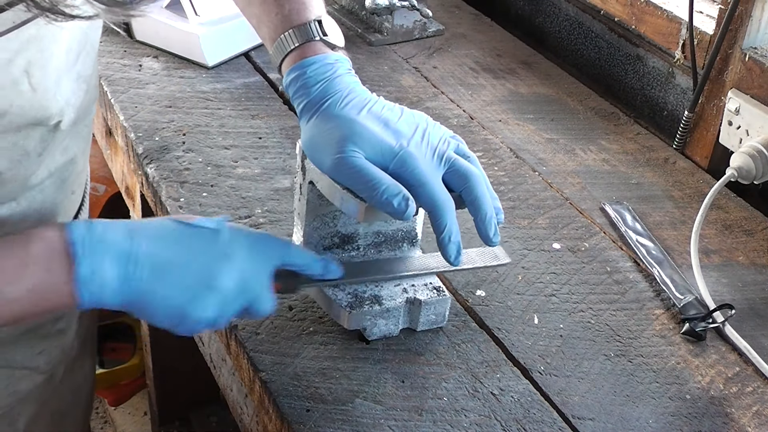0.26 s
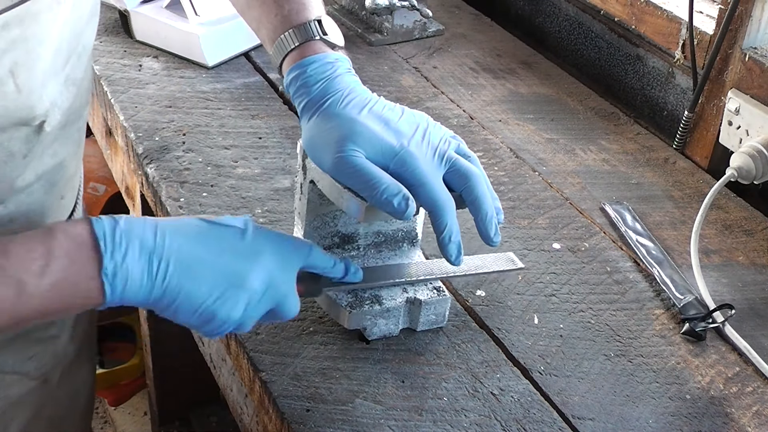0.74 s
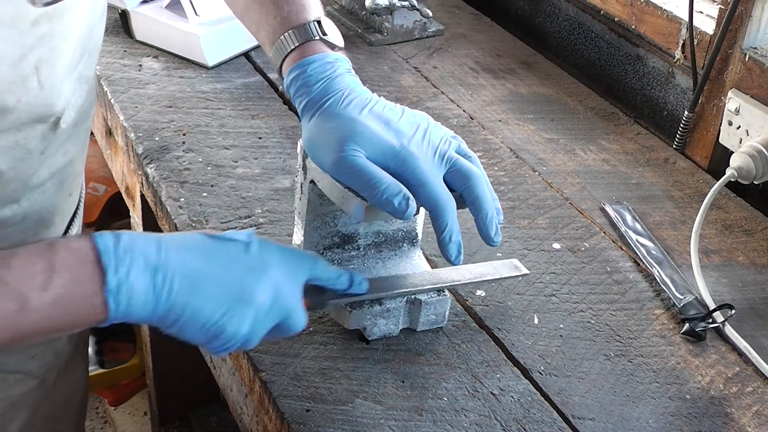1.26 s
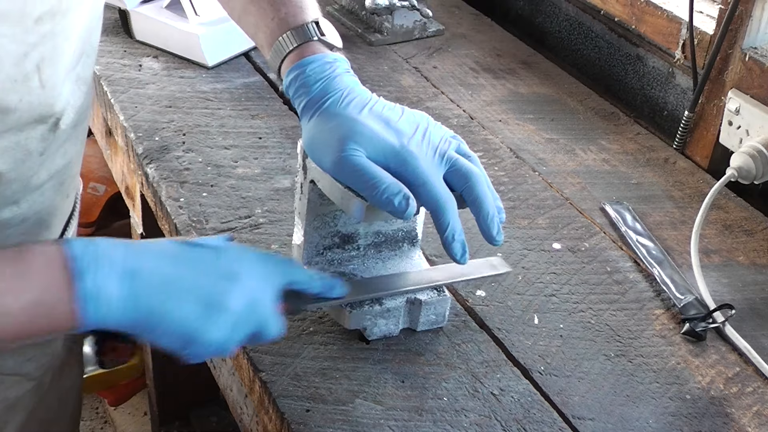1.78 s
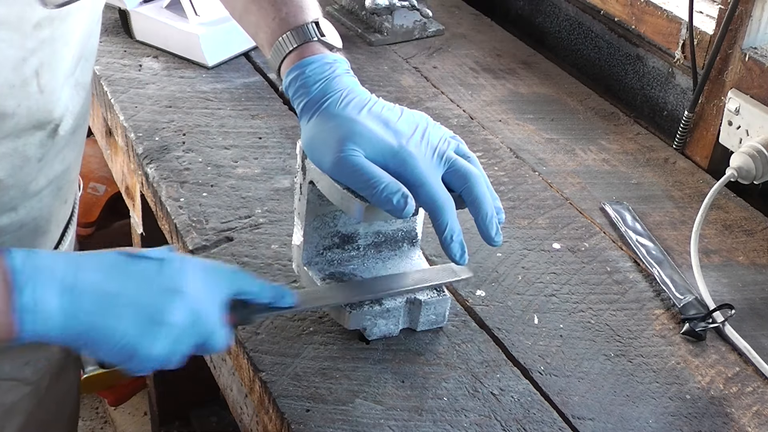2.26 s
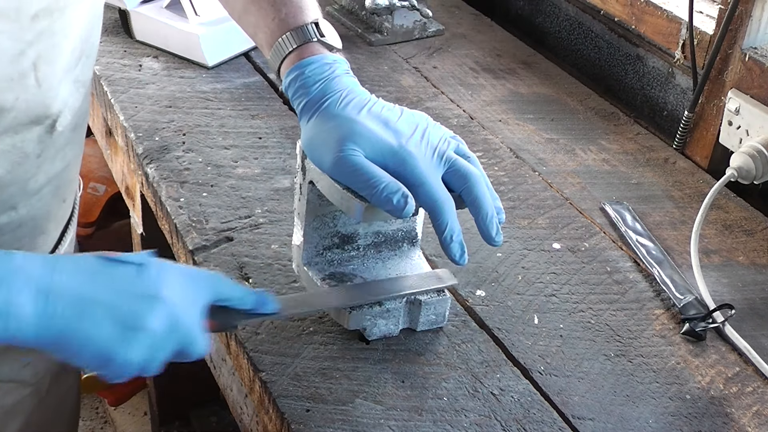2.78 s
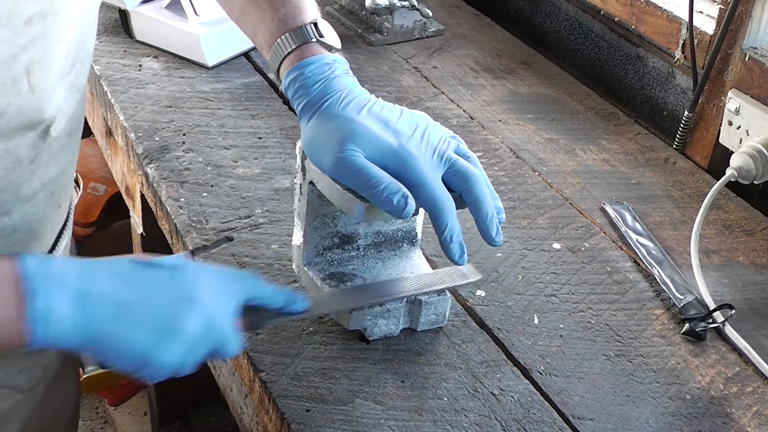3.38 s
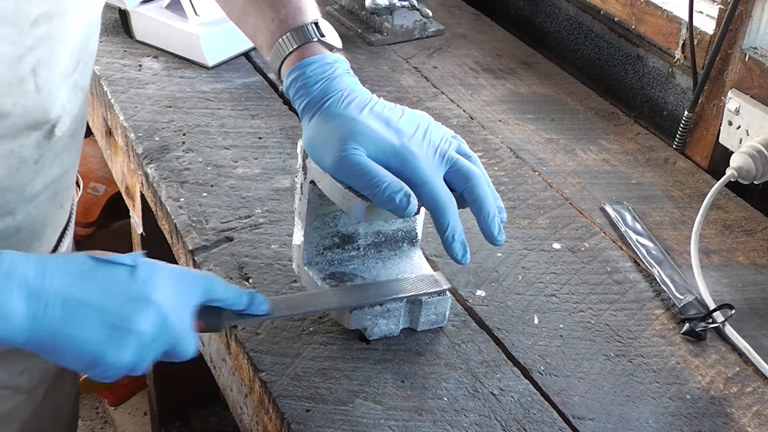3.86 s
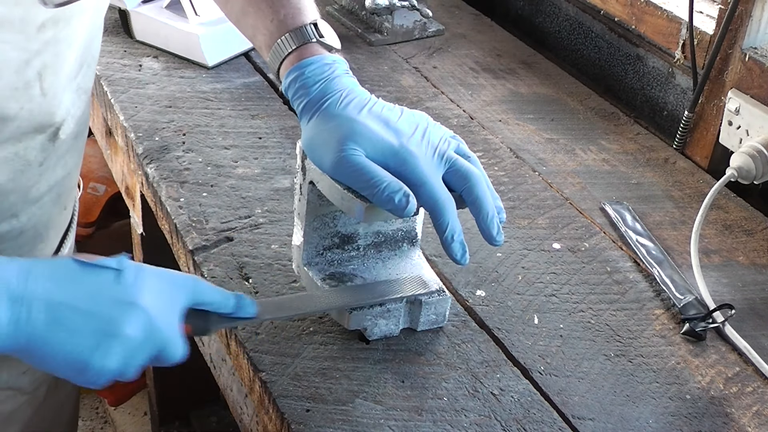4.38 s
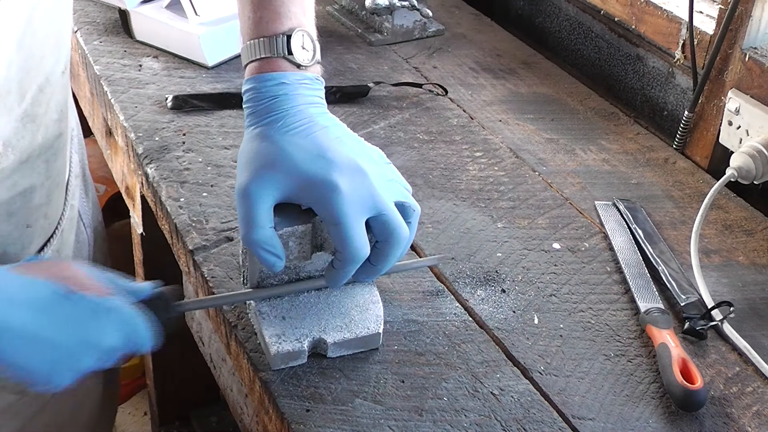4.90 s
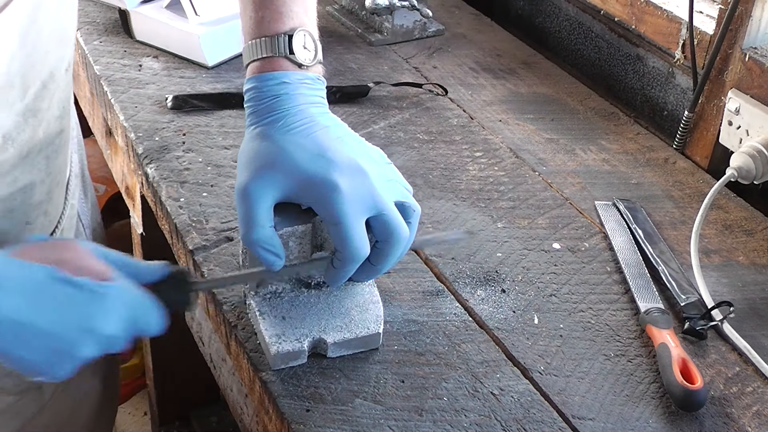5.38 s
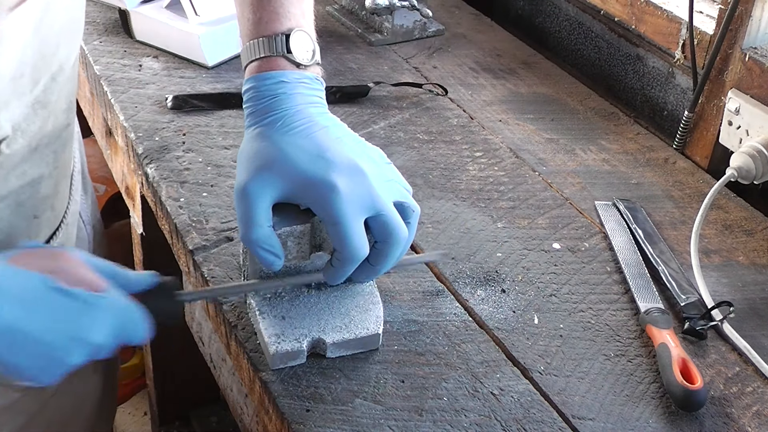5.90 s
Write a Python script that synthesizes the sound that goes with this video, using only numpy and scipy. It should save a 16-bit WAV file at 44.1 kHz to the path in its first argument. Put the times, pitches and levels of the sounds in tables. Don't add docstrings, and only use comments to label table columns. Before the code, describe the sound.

Close stereo microphone in a small workshop. A wide steel file rasps a porous metal casting on a wooden bench, roughly two strokes a second. Each lands with a sharp tap, swells into dense, bright grating with a hollow grinding judder, then eases off to a brief gap. Near the end a slimmer file ticks into place and makes a longer, thinner scrape, a tapped shorter one and the start of another. A low hum lies underneath.

```python
import sys
import numpy as np
from scipy import signal
from scipy.fft import rfft, irfft, next_fast_len
from scipy.io import wavfile
from scipy.ndimage import uniform_filter1d, map_coordinates

SR = 44100
rng = np.random.default_rng(int(sys.argv[2]) if len(sys.argv) > 2 else 0)


def digitize_waveform(pressure):
    field = np.atleast_2d(pressure).T
    bounded = np.clip(field, -1, 1)
    quanta = np.round(bounded * 32767).astype(np.int16)
    wavfile.write(sys.argv[1], SR, quanta)


def volts_from_db(level):
    exponent = np.asarray(level, float) / 20
    return 10 ** exponent


N = 270774
SIZE = next_fast_len(N + SR)
HZ = np.fft.rfftfreq(SIZE, 1 / SR)
SWAP_S = 4.845

# landing_s, pause_s, rise_s, hold_s, blade_db at full push
STROKES = [(-.05, 0.051, 0.08, 0.13, -31.5), (0.538, 0.041, .14, 0.046, -38),
           (1.067, 0.06, 0.096, 0.075, -29), (1.616, 0.038, 0.089, 0.13, -32),
           (2.144, 0.062, 0.099, .12, -30), (2.761, 0.021, 0.071, 0.13, -28.5),
           (3.239, 0.073, .035, 0.21, -32), (3.812, 0.041, .11, 0.13, -29),
           (4.364, .035, 0.098, 0.1, -25.5), (4.854, .19, .03, 0.25, -33.5), (5.589, 0.043, .08, 0.1, -33),
           (6.047, 0.0015, 0.0035, 0.048, -36.5)]
# skid_db, skid_on_work_db, change_over_hold_db,
# casting_over_blade_db, bench_over_blade_db
LEAN = [(-63, 7.5, -1, 6.5, 7.5), (-36, -14, 1, 5.5, 3.5), (-35, -6.5, -1, 10, 7.5),
        (-34.5, -3.5, 3, 6.5, 4.5), (-34, 4.5, -1, 10.5, 7), (-39, 1, -5, 8.5, 3), (-28, -2, -1, 8, 6),
        (-33.5, 1.5, -9, 5.5, 4.5), (-34, 1, -9, 7.5, 1), (-72.5, -15, -7.5, 8, 11),
        (-32.5, 4.5, -3, 7, 12), (-30.5, -1.5, -0.5, 5, 9)]
PUSH_FOLLOWS = [1.017, 1.157, 0.8, 0.53]
# centre_s, half_length_s, casting_db, bench_db
SURGES = [(0.251, .05, 5, 6.5), (.66, .04, 1, 6), (0.846, .025, 9, 9.5), (1.19, 0.023, 5.5, 2),
          (1.41, 0.026, 13, 6), (1.77, 0.039, 2.5, 4.5), (1.897, .03, 8, 1), (2.399, .03, 0.5, 4),
          (3.43, .04, 2, 7), (3.57, .025, 9.5, -1.5), (3.962, .035, 7.5, 8.5), (4.967, .07, -6.5, -8.5),
          (5.071, .03, -7, 5.5), (5.259, .07, 4.5, 7.5), (5.731, 0.022, 5.5, 6)]
# start_s, peak_db, edge_db, casting_db, bench_db
TAPS = [(0.5414, -21, 12.5, -5, -17.5), (1.064, -17.5, -3, 13.5, 1), (1.6179, -19.5, 9, -1.5, -20),
        (2.141, -21, 8.5, 3, -4), (2.1729, -37, 13.5, 11, 11), (2.7575, -29.5, 4.5, 7.5, -13),
        (2.7898, -25.5, 3.5, 10, -6), (2.825, -23.5, 11.5, 5.5, -16), (3.2334, -23.5, 6, 12, 1),
        (3.8135, -18.5, 2.5, -8, -18), (4.3661, -28, 7.5, 14, -8), (5.5907, -21.5, -31, -20, -22),
        (5.6055, -19.5, -34, 9, -2.5), (5.654, -34, -4, -16, -7), (6.0482, -21, 1.5, -18, -4),
        (6.124, -30, -0.5, -20, 5)]
# start_s, peak_db, edge_db, casting_db
CATCHES = [(0.0218, -42, -2.5, 10.5), (0.2868, -40, 10.5, 13.5), (0.3074, -36, 8.5, 1),
           (0.3328, -43.5, -12.5, -0.5), (0.6198, -41.5, 9, 6), (0.8404, -41.5, 3, 14),
           (1.1439, -42.5, 5.5, 5.5), (1.1712, -22, 7, 10), (1.4104, -37.5, 7, 10), (1.6814, -30.5, 4.5, 0),
           (2.4433, -23, 0.5, 12), (3.3268, -24.5, 11.5, -7), (3.413, -17, 5, 11),
           (3.6152, -35.5, -4.5, -11), (3.8842, -36.5, 1, -11), (4.0825, -23, 5, 11), (4.4298, -26, 0, 2),
           (5.07, -24.5, -0.5, -23)]
# pitch_hz, width_hz, level_db
BLADE_MODES = [
    [(3306, 38, -7), (4330, 40, 0), (6590, 410, -10)],
    [(3040, 84.7, -12.5), (4300, 48, -2.5), (5162, 44, -15), (5710, 34.92, -6.5)],
]
EDGE_MODES = [
    [(8716, 380, -2.5), (11055, 94, 6), (13570, 200, -5)],
    [(8100, 19, 0.5), (8237, 25, -7), (9380, 56.7, -6.5)],
]
CASTING_MODES = [
    [(898, 14, -10), (1079, 30, 0.5), (1117.4, 17, 2), (1175, 10, -0.5), (1396, 21, -3.5), (1335, 24, -12)],
    [(1001.6, 74, -3), (1188.2, 130, -0.5), (1396, 46, 5)],
]
BENCH_MODES = [
    [(187, 65, -12), (535, 17, -3.5)],
    [(180, 52, 3.5), (357, 65, 0.5), (531, 15, -3), (783, 20, -3)],
]
# pitch_hz, width_hz, level_db
BLADE_SINGING = [
    [(2410, 16, -9), (4336, 12, 2), (6675, 14, -11)],
    [(2433, 22, -8), (6675, 10, 1)],
]
EDGE_SINGING = [
    [(9465, 14, 1), (10573, 14, 5)],
    [(8226, 11, 1), (8646, 13, -3), (10960, 20, -3), (11480, 14, -4), (13500, 30, -9), (14850, 20, -6)],
]
# pitch_hz, level_db per Hz
BLADE_SCRAPE = [
    [(1290, -36.5), (2200, -15), (3860, -10.5), (4340, -7.5), (7400, -6), (9620, -30), (16300, -120)],
    [(1290, -23.5), (2200, -14), (3420, -14), (4430, -6.5), (7400, -17.5), (9620, -40), (16300, -120)],
]
EDGE_SCRAPE = [
    [(4350, -34.5), (7400, -9.5), (10000, -2), (11000, -1.5), (12300, -15.5), (14000, -19), (16000, -9.5)],
    [(4350, -31), (7400, -16.5), (8000, -7.5), (10400, -6), (12400, -18), (14600, -18), (16000, -23.5)],
]
CASTING_GRIND = [
    [(500, -45.5), (850, -31.5), (1140, -5.5), (1250, -2), (2200, -19.5), (2860, -71), (4840, -120)],
    [(500, -30), (850, 3), (1310, -2), (1410, 4.5), (2200, -15), (2860, -54), (4840, -120)],
]
BENCH_DRUM = [
    [(24, -54), (40, -28), (168, 6), (290, -2), (543, 1.5), (850, -8.5), (1100, -42), (1870, -120)],
    [(24, -21.5), (40, -0.5), (107, -7), (176, 2), (550, -1), (850, -13), (1100, -54.5), (1870, -120)],
]
# start_s, peak_db, brightness_db per octave
TICKS = [(4.8924, -34, 3), (4.9043, -21, 13), (4.9524, -20.5, -1), (4.9828, -36, -1), (5.018, -48, 1),
         (5.0442, -42, 0.1)]
# pitch_hz, left_minus_right_db
STEREO_TILT = [(5000, 0), (9000, -2.6), (12000, -1), (14000, 1.5)]
# pitch_hz, left_lead_radians
STEREO_LEAD = [(5800, 0), (10900, -.45), (12300, .2), (13300, 1.1), (14600, .2)]
# pitch_hz, level_db
SCATTER = [(100, -37), (300, -21), (2000, -20), (5000, -14), (9000, -17), (14000, -11)]
# pitch_hz, t60_s
ROOM_DECAY = [(100, 0.14), (1000, 0.24), (4000, 0.23), (12000, 0.017)]
# centre_s, half_length_s, level_db
ROCKING = [(.27, 0.085, -29.5), (1.082, 0.021, -31), (1.22, 0.079, -30), (2.419, 0.086, -33),
           (3.34, 0.045, -38), (4.87, .04, -39), (5.193, 0.094, -52), (5.8, 0.068, -34), (6.077, 0.04, -34)]
# pitch_hz, level_db per Hz
LEGS = [(15, -37), (35, -6.5), (120, 2.5), (190, -5.5), (320, -33), (600, -120)]
# pitch_hz, level_db per Hz
HUM_COLOUR = [(12, -32.5), (20, -13), (65, 0), (104, -6.5), (255, -7), (357, -22), (558, -13.5), (698, -28),
              (849, -18), (2140, -39.5), (2390, -53), (5230, -47), (16000, -54)]
# time_s, level_db
HUM_SWELL = [(0.0, -37), (0.36, -40), (3.56, -37.5), (4.89, -41.5), (5.151, -39), (6.14, -37.5)]
# pitch_hz, left_right_likeness
HUM_ALIKE = [(30, .8), (70, .97), (140, .997), (800, .97), (4000, .2)]


def unit(x):
    return x / np.sqrt(np.mean(np.abs(x) ** 2) + 1e-20)


def along(points, hz):
    f, v = np.transpose(points)
    return np.interp(np.log(hz + 1), np.log(f + 1), v)


def wobble(rate):
    knots = rng.standard_normal(int(N * rate / SR) + 4)
    return map_coordinates(knots, [np.arange(N) * rate / SR])


def filtered(x, response):
    return irfft(rfft(x, SIZE) * response, SIZE)[..., :N]


def file_on_casting():
    chatter = volts_from_db(1.1 * wobble(45) + 1 * wobble(160))
    teeth = bites(rate=2600, spread_db=4.5, smooth=1.1)
    lumps = bites(rate=600, spread_db=3.5, smooth=1.6)
    contact = np.array([teeth, teeth, lumps, lumps])
    drive = unit(chatter) * sliding(contact, patchy_db=2.2, drift_db=2.2)

    gain, tooth_hz = controls()
    bearing_db = surges()
    gain[2:] *= volts_from_db(bearing_db)
    beat = judder(tooth_hz * volts_from_db(0.2 * bearing_db[1]), unsteady=.2)
    drive[2:] += volts_from_db(-16.5 + 0.36 * bearing_db[1]) * beat

    force = gain * drive
    force += blows(TAPS, lift_db=[15.8, 14.4, 15.3, 25.0], smear_s=[0.025, 0.021, 0.031, 0.11],
                   click=[2.5, 6.8, 0.71, 0.5], rise_s=.0001)
    force += blows(CATCHES, lift_db=[15, 17, 18], smear_s=[.05, .045, .06],
                   click=[0, 0, 0], rise_s=.004)

    wide_held = np.arange(N) < SWAP_S * SR
    sound = np.zeros(N)
    for k, held in enumerate([wide_held, ~wide_held]):
        parts = [body(BLADE_SCRAPE[k], BLADE_MODES[k] + BLADE_SINGING[k], between_db=[-9, -3][k]),
                 body(EDGE_SCRAPE[k], EDGE_MODES[k] + EDGE_SINGING[k], between_db=[-8, -3][k]),
                 body(CASTING_GRIND[k], CASTING_MODES[k], between_db=[-9, -6][k]),
                 body(BENCH_DRUM[k], BENCH_MODES[k], between_db=[-4, -5][k])]
        sound += filtered(force * held, np.array(parts)).sum(axis=0)
    return sound + ticks()


def controls():
    pause_db, rise_bow_db, arch_db = -23, 2.5, 2
    ease_s, ease_db, lift_s, lift_db = 0.054, -19, .15, -30
    idle_hz, fast_hz, speed_follows = 211.25, 477.6, .6
    skid_part_db = [-4, -10, 11.5, -3]
    skid_t60_s = np.array([0.17, .12, 0.13, 0.67])
    t, gain, tooth_hz = np.arange(N) / SR, np.zeros((4, N)), np.zeros(N)
    for stroke, lean in zip(STROKES, LEAN):
        land, pause, rise, hold, db = stroke
        skid_db, weight_db, change_db, casting_db, bench_db = lean
        lengths = [0, pause, rise / 2, rise / 2, hold / 2, hold / 2, ease_s, lift_s]
        s = land + np.cumsum(np.abs(lengths))
        eased_db = change_db + ease_db
        push_db = [pause_db, pause_db, pause_db / 2 + rise_bow_db, 0, change_db / 2 + arch_db, change_db,
                   eased_db, eased_db + lift_db]
        on = (t >= land) & (t <= s[-1])
        push = np.interp(t[on], s, push_db)

        edge_db = 1.5 if land > SWAP_S else 5
        over_blade_db = np.array([0, edge_db, casting_db, bench_db])
        rasp_db = (db + over_blade_db)[:, None] + np.outer(PUSH_FOLLOWS, push)
        landing_db = skid_db + np.add(skid_part_db, [0, 0, weight_db, weight_db])
        fading_db = landing_db[:, None] - 60 * np.outer(1 / skid_t60_s, t[on] - land)
        gain[:, on] = np.hypot(volts_from_db(rasp_db), volts_from_db(fading_db))
        tooth_hz[on] = idle_hz + (fast_hz - idle_hz) * volts_from_db(speed_follows * push)
    return gain, tooth_hz


def surges():
    t = np.arange(N) / SR
    return sum(np.outer(db, np.exp(-((t - s) / half) ** 2)) for s, half, *db in SURGES)


def bites(rate, spread_db, smooth):
    hit = rng.random(N) < rate / SR
    size_db = spread_db * np.clip(rng.standard_normal(N), -2, 2)
    size = volts_from_db(size_db) * rng.choice([-1, 1], N)
    return unit(unit(hit * size) + smooth * rng.standard_normal(N))


def sliding(x, patchy_db, drift_db):
    z = signal.stft(x, nperseg=256)[2]

    def unevenness(frames):
        across_pitch = uniform_filter1d(rng.standard_normal(z.shape), 4, -2)
        return unit(uniform_filter1d(across_pitch, frames, -1))

    patches, drift = unevenness(9), unevenness(50)
    moved = z * volts_from_db(patchy_db * patches + drift_db * drift)
    return unit(signal.istft(moved, nperseg=256)[1][..., :N])


def judder(tooth_hz, unsteady):
    phase = 2 * np.pi * np.cumsum(tooth_hz * (1 + unsteady * wobble(150))) / SR
    return (np.sin(phase) + 0.96 * np.sin(2 * phase)) * volts_from_db(3.14 * wobble(90))


def blows(events, lift_db, smear_s, click, rise_s):
    force, t = np.zeros((4, N + SR)), np.arange(SR // 20) / SR
    tail = volts_from_db(-60 * t / np.array(smear_s)[:, None])
    shape = tail + np.array(click)[:, None] * volts_from_db(-60 * t / 0.006)
    shape = shape * (1 - np.exp(-t / rise_s))
    for s, db, *rel in events:
        grit = rng.standard_normal(shape.shape) * shape
        grit /= np.linalg.norm(grit, axis=1)[:, None]
        level = volts_from_db(db + np.array([0, *rel]) + lift_db)[:, None]
        force[:len(shape), round(s * SR):][:, :len(t)] += level * grit
    return force[:, :N]


def body(spectrum, modes, between_db):
    power = volts_from_db(2 * (between_db + along(spectrum, HZ)))
    for hz, width, db in modes:
        skirt = np.exp(-((HZ - hz) / (0.11 * hz)) ** 2)
        power = power + volts_from_db(2 * db) * skirt / (1 + (2 * (HZ - hz) / width) ** 2)
    cepstrum = irfft(np.log(power + 1e-9) / 2, SIZE)
    cepstrum[1:SIZE // 2] *= 2
    cepstrum[SIZE // 2 + 1:] = 0
    return unit(np.exp(rfft(cepstrum)))


def ticks():
    t60_s, tail_s, tail_db, low_hz = .004, 0.057, -8, 2000
    out, t = np.zeros(N), np.arange(SR // 16) / SR
    in_taps = [(s, db - 10.5, -4) for s, db, *_ in TAPS]
    for s, db, tilt_db in TICKS + in_taps:
        puff = rng.standard_normal(len(t)) * (volts_from_db(-60 * t / t60_s) + volts_from_db(tail_db - 60 * t / tail_s))
        tilt = volts_from_db(tilt_db * np.log2((HZ + 1) / 7000))
        colour = tilt * HZ ** 2 / (HZ ** 2 + low_hz ** 2)
        out += volts_from_db(db) * filtered(np.pad(puff, (round(s * SR), 0)), colour)
    return out


def scattered(x):
    t = np.arange(SR // 20) / SR
    bounce = rfft(rng.standard_normal(len(t)) * volts_from_db(-60 * t / 0.028), SIZE)
    spread = filtered(x * wobble(53), unit(bounce) * volts_from_db(along(SCATTER, HZ)))
    return spread * np.array([[1], [-1]])


def rocking():
    t = np.arange(N) / SR
    give = sum(volts_from_db(db) * np.exp(-((t - s) / half) ** 2) for s, half, db in ROCKING)
    return give * unit(filtered(rng.standard_normal(N), volts_from_db(along(LEGS, HZ))))


def shop(x):
    hz, t, z = signal.stft(rng.standard_normal((2, SR // 2)), SR, nperseg=256)
    decay = volts_from_db(-60 * t / along(ROOM_DECAY, hz)[:, None])
    tail = signal.istft(z * decay, SR, nperseg=256)[1]
    middle = tail.mean(axis=0)
    tail = middle + .08 * (tail - middle)
    late = np.pad(x, (200, 0))[None]
    return signal.fftconvolve(late, tail / np.linalg.norm(tail[0]), axes=1)[:, :N]


def hum():
    turn = np.arccos(np.clip(along(HUM_ALIKE, HZ), -1, 1)) / 2
    colour = volts_from_db(along(HUM_COLOUR, HZ))
    mid, side = filtered(rng.standard_normal((2, N)), colour * [np.cos(turn), np.sin(turn)])
    s, db = np.transpose(HUM_SWELL)
    level_db = np.interp(np.arange(N) / SR, s, db) + .6 * wobble(21)
    return volts_from_db(level_db) * unit(np.array([mid + side, mid - side]))


def scene():
    rasp = file_on_casting()
    half = volts_from_db(along(STEREO_TILT, HZ) / 2) * np.exp(.5j * along(STEREO_LEAD, HZ))
    direct = filtered(rasp, np.array([half, 1 / half]))
    room = volts_from_db(-17) * shop(rasp)
    return direct + scattered(rasp) + room + hum() + rocking()


def roll_off(x):
    return signal.sosfilt(signal.butter(12, 16850, fs=SR, output="sos"), x)


def record(dry):
    top_hz, slope_hz = 15760, 40
    band = .5 - .5 * np.tanh((HZ - top_hz) / slope_hz)
    leak = volts_from_db(-38) * (HZ < 16830)
    mix = filtered(dry, np.maximum(band, leak))
    return roll_off(mix)


dry = scene()
out = record(dry)
digitize_waveform(out)
```